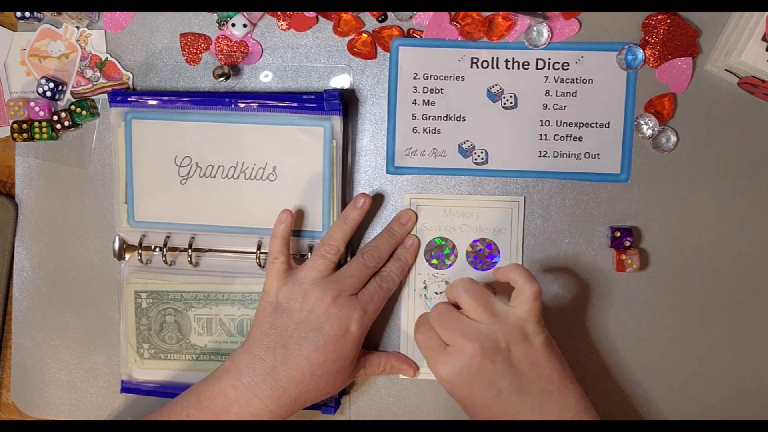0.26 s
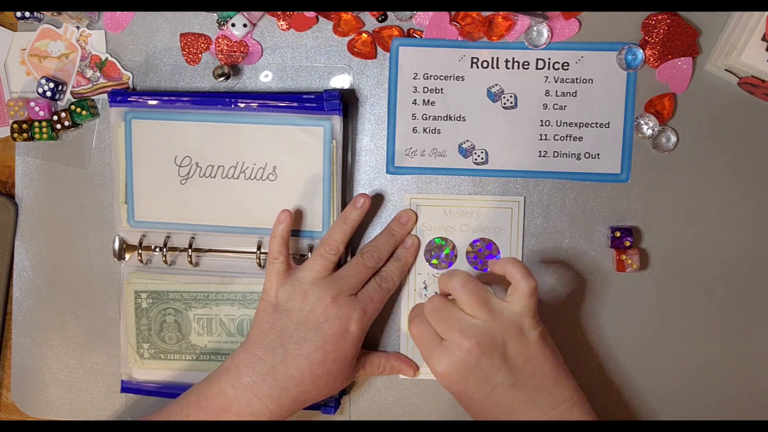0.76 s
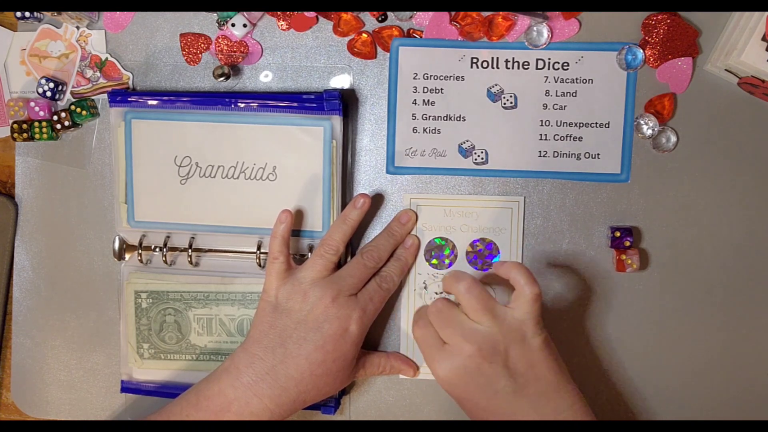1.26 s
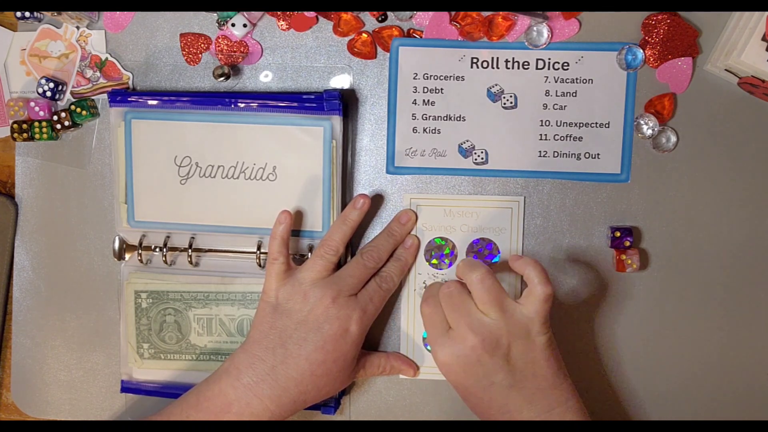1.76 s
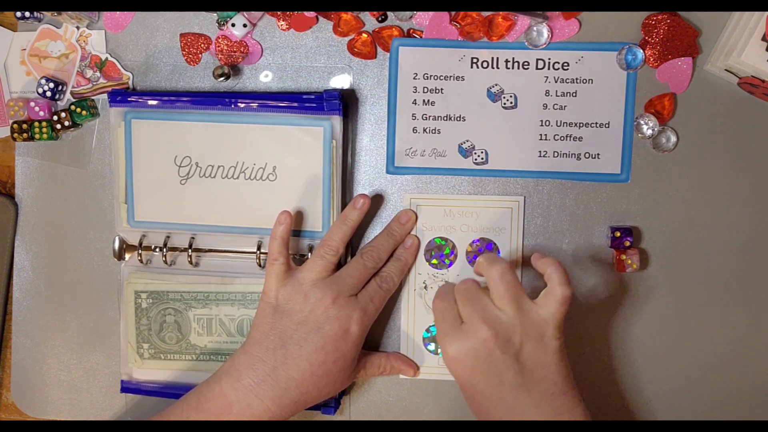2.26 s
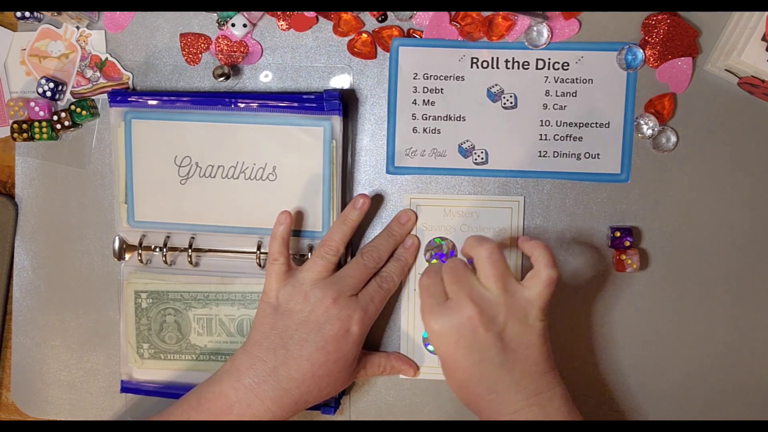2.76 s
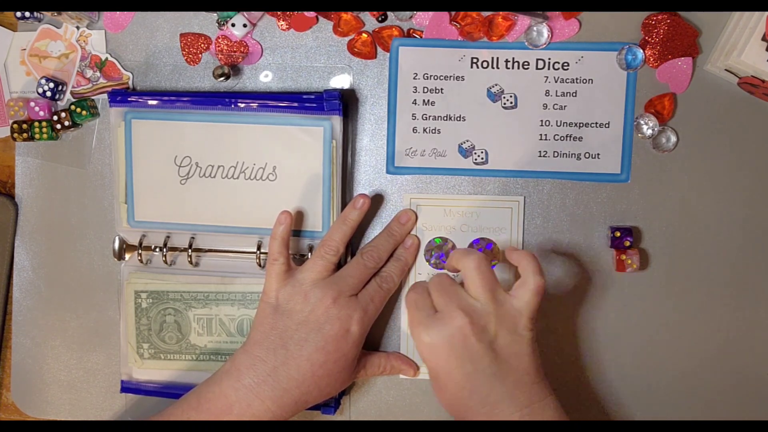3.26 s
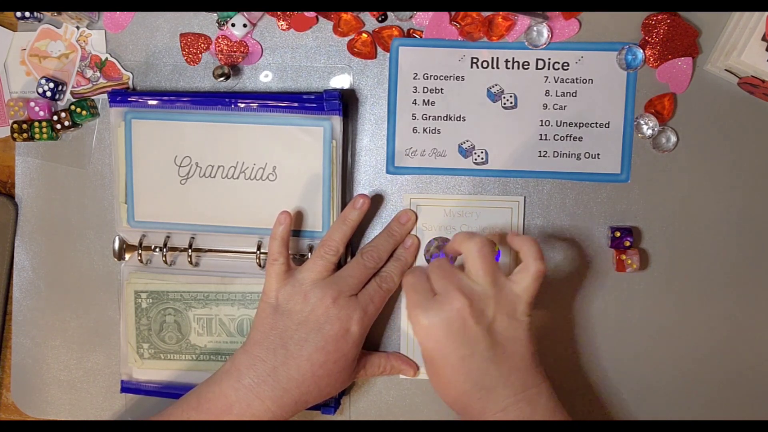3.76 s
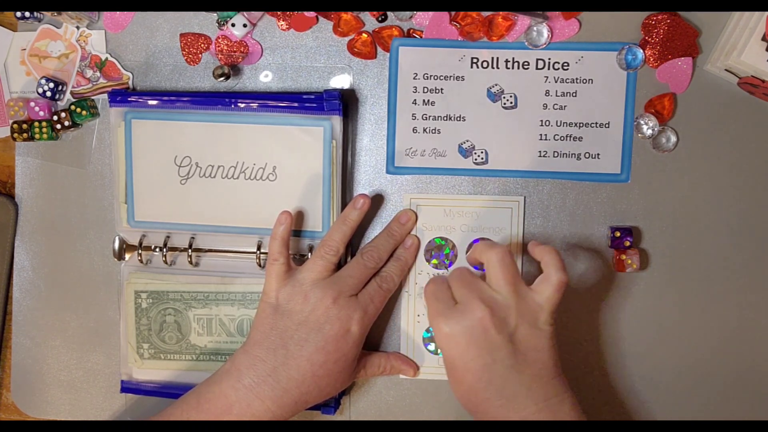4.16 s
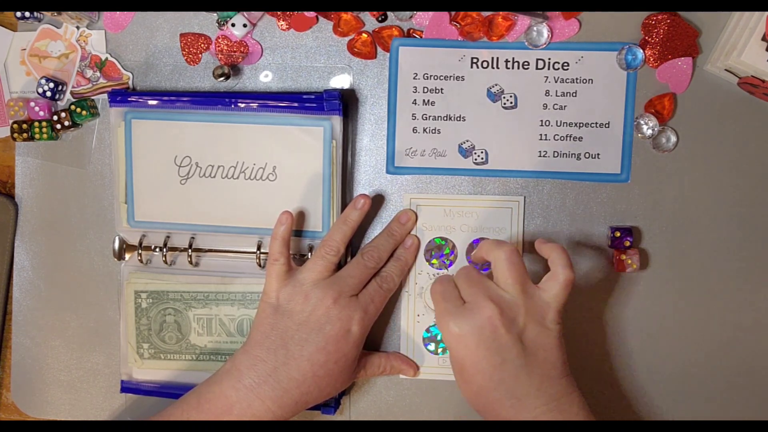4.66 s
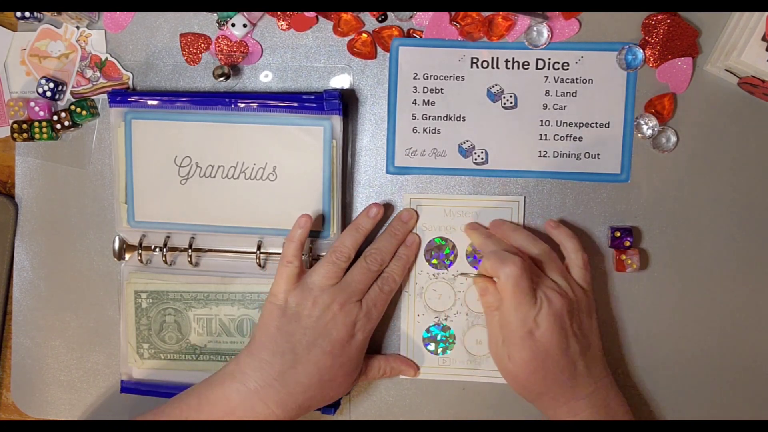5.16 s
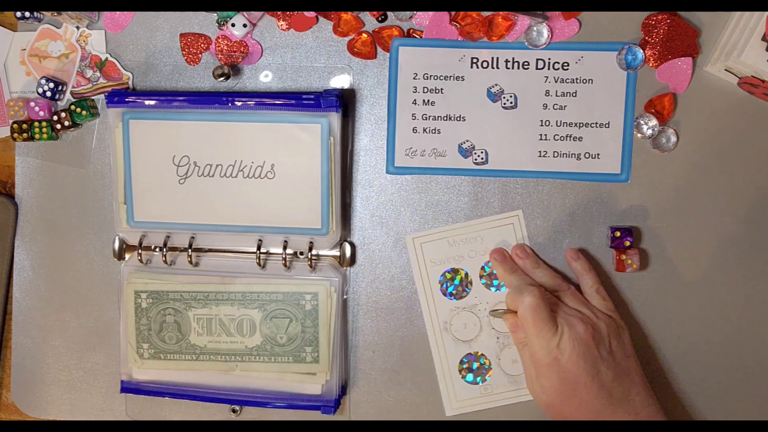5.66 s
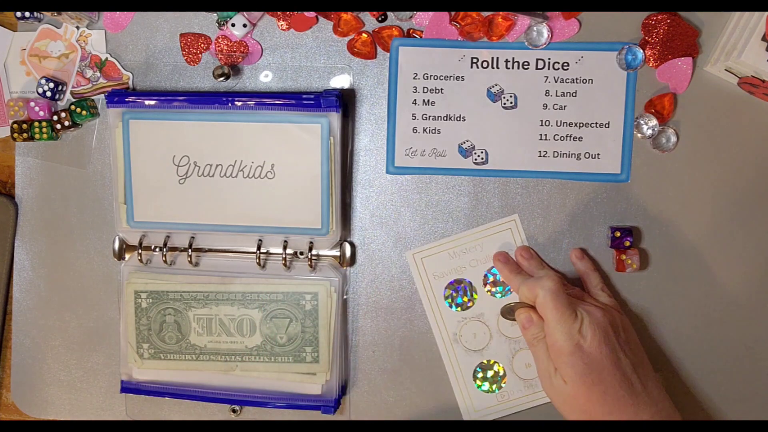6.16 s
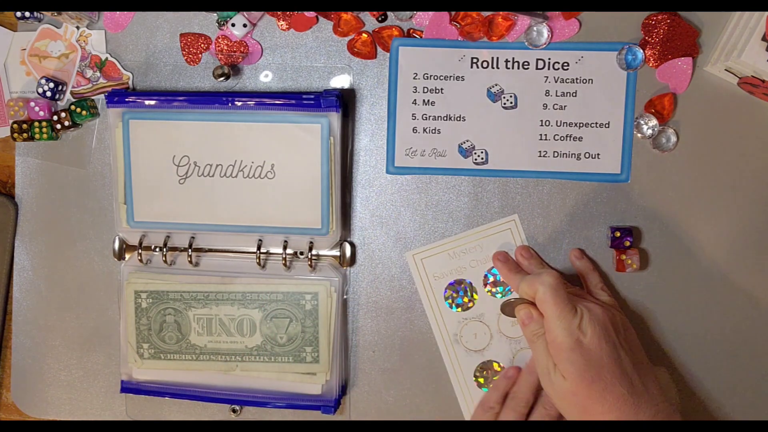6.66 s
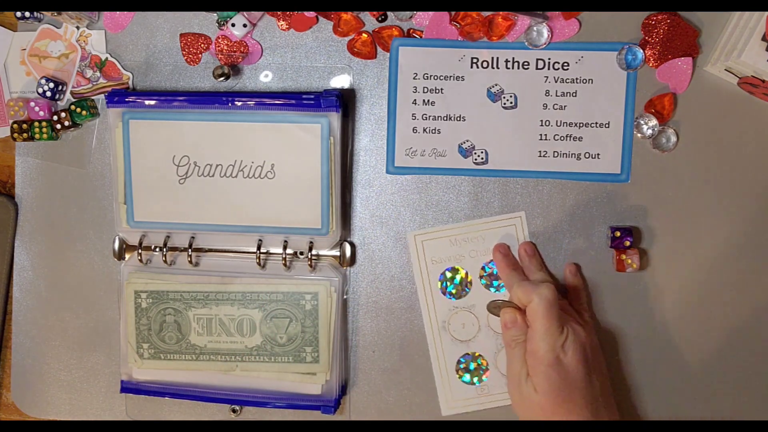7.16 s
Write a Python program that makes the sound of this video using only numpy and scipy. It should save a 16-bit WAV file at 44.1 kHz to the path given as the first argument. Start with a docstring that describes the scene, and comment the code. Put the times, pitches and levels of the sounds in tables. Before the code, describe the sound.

Rapid scratchy scraping on a paper card over a table, a sharp hissing slide, then a hand slapping and sweeping crumbs away four times.

```python
"""Quick rasping strokes: a coin edge scratches the coating off a paper card on a table.
Then the card slides round with dense hiss, and a hand slaps down and wipes the crumbs off four times.
Rasp, hiss and drag are shaped random grit through card, table and microphone resonances (ringing near 5 kHz).
Ticks and squeaks are sines, thumps ring table modes; a short room tail, rumble and hush lie behind."""
import sys
import numpy as np
from scipy import signal
from scipy.fft import rfft, irfft, next_fast_len
from scipy.io import wavfile
from scipy.ndimage import uniform_filter1d

SR = 44100
rng = np.random.default_rng(int(sys.argv[2]) if len(sys.argv) > 2 else 0)


def waveform_to_disk(signal):
    """Save audio, clipped to [-1, 1], as 16-bit WAV at the path in sys.argv[1]."""
    frames = np.transpose(np.atleast_2d(signal))
    scaled = np.clip(frames, -1, 1) * 32767
    samples = np.round(scaled).astype(np.int16)
    wavfile.write(sys.argv[1], SR, samples)


N = 326340  # samples


def amp(db):
    """Gain of a level in dB."""
    return 10 ** (np.asarray(db) / 20)


def rms_one(x):
    """Scale to rms 1."""
    return x / np.sqrt(np.mean(x ** 2) + 1e-20)


def at_hz(points, hz):
    """Interpolate a spectrum on a log-frequency axis."""
    point_hz, level = np.transpose(points)
    return np.interp(np.log(hz), np.log(point_hz), level)


def drift(corner_hz):
    """Random drift, rms 1: white noise through two equal one-pole lowpasses."""
    warmup = 9000
    r = np.exp(-2 * np.pi * corner_hz / SR)
    noise = rng.standard_normal(N + warmup)
    return rms_one(signal.lfilter([1], [1, -2 * r, r * r], noise)[warmup:])


# microphone pair, left-right likeness: (frequency [Hz], likeness [0-1])
LIKENESS = [(60, 0.98), (130, 0.93), (290, 0.72), (640, 0.46), (1410, 0), (3100, 0.18), (6820, 0.23),
            (15000, 0.0)]
# microphone pair, left minus right: (frequency [Hz], level [dB])
BALANCE = [(60, 0), (110, -2.5), (200, 2), (380, 0), (700, 3.5), (1290, -1.5), (2380, 1.5), (4400, -4.5),
           (8120, 6), (15000, -5)]


def grit(per_s, spread_db, spectrum):
    """Random stereo impulses of uneven size: tiny catches, partly alike left and right, coloured, rms 1."""
    size_db = spread_db * np.minimum(rng.exponential(1, (2, N)), 5)
    sizes = amp(size_db) * rng.standard_normal((2, N))
    catches = sizes * (rng.random(N) < per_s / SR)
    fft_size = next_fast_len(N)
    mid, side = rfft(catches, fft_size)
    hz = np.maximum(np.arange(len(mid)) * SR / fft_size, 1)
    alike = np.clip(at_hz(LIKENESS, hz), 0, 1)
    left_right = np.array([[1], [-1]])
    pair = np.sqrt(1 + alike) * mid + np.sqrt(1 - alike) * side * left_right
    balance = amp(at_hz(BALANCE, hz) / 2 * left_right)
    return rms_one(irfft(pair * balance * amp(at_hz(spectrum, hz)), fft_size)[:, :N])


def resonate(x, modes, direct_db, wander_db=0, centre_hz=None):
    """Parallel bandpass modes plus direct sound, rms 1; levels wander singly, modes near centre_hz favoured."""
    out = amp(direct_db) * x
    for k, (hz, width_hz, db) in enumerate(modes):
        r = np.exp(-np.pi * width_hz / SR)
        if wander_db:
            db = db + wander_db * drift(25.6)
        if centre_hz is not None:
            db = db - 40 * np.log2(hz / centre_hz) ** 2
        zeros = [(1 - r * r) / 2, 0, (r * r - 1) / 2]
        poles = [1, -2 * r * np.cos(2 * np.pi * hz / SR), r * r]
        out = out + (-1) ** k * amp(db) * signal.lfilter(zeros, poles, x)  # alternate polarity
    return rms_one(out)


# coin strokes: (full pressure [s], held [s], 13.5 dB fall time [s], rasp level [dB],
#                weight on the card over rasp [dB])
STROKES = [(0.018, 0.003, 0.0089, -56, -11.5), (0.045, 0.011, 0.019, -55, -10),
           (0.122, 0.004, 0.024, -65.5, 1.5), (0.162, 0.023, 0.011, -67.5, -4),
           (0.249, 0.0048, 0.012, -57.5, -6.0), (0.283, 0.022, 0.019, -56, -8),
           (0.372, 0.025, 0.03, -57, -5), (0.509, 0.0018, 0.051, -60, -3),
           (0.622, 0.0018, 0.018, -64.5, 4.5), (0.662, 0.023, 0.016, -66.5, -5.5),
           (0.758, 0.0055, 0.039, -66.5, -4.5), (0.86, 0.012, 0.068, -60.5, -8.5),
           (0.995, 0.017, 0.012, -53.5, -8.0), (1.09, 0.024, 0.083, -68.5, -4),
           (1.237, 0.051, 0.027, -59, -6.0), (1.36, 0.0067, 0.027, -55, -6.0),
           (1.491, 0.0034, 0.0055, -57, -6), (1.513, 0.019, 0.022, -60, 1),
           (1.595, 0.0086, 0.038, -60.5, -3.5), (1.736, 0.0044, 0.033, -53.5, -3.5),
           (1.824, 0.002, 0.036, -64.5, -1), (1.926, 0.013, 0.027, -60.5, -2.0),
           (2.009, 0.0057, 0.025, -58, -4.5), (2.097, 0.0097, 0.014, -60.5, -7.5),
           (2.168, 0.015, 0.017, -57, -5.5), (2.246, 0.017, 0.0094, -59, -9),
           (2.327, 0.029, 0.018, -58.5, -8), (2.406, 0.009, 0.02, -67, 1),
           (2.494, 0.02, 0.0088, -59.5, -8.5), (2.553, 0.0018, 0.026, -58.5, -7.0),
           (2.648, 0.0022, 0.03, -60.5, -1), (2.706, 0.008, 0.011, -60, -6.5),
           (2.79, 0.015, 0.016, -57.5, -4), (2.866, 0.0062, 0.027, -60.5, -3.5),
           (2.948, 0.0058, 0.022, -55.5, -2.0), (3.012, 0.016, 0.014, -62.5, -1.5),
           (3.097, 0.0017, 0.015, -55.5, -2.5), (3.161, 0.002, 0.025, -57.5, -7.5),
           (3.246, 0.014, 0.013, -58.5, -4), (3.31, 0.002, 0.031, -58.5, -3.5),
           (3.383, 0.033, 0.014, -67.5, 2), (3.464, 0.035, 0.008, -59.5, -6),
           (3.55, 0.002, 0.032, -58.5, -2), (3.627, 0.015, 0.035, -57.5, -7),
           (3.708, 0.0019, 0.028, -51, -6.5), (3.777, 0.014, 0.021, -57, -6.5),
           (3.847, 0.027, 0.01, -58.5, -5), (3.927, 0.021, 0.033, -58.5, -3.5),
           (4.011, 0.003, 0.044, -63.5, -3), (4.095, 0.032, 0.024, -66, 1.5),
           (4.169, 0.002, 0.042, -61.5, -5), (4.251, 0.031, 0.039, -68.5, 3),
           (4.341, 0.0018, 0.021, -56, -4), (4.403, 0.039, 0.022, -69, 4.5),
           (4.485, 0.01, 0.017, -61.5, 1.0), (4.553, 0.028, 0.02, -67.5, 0.5),
           (4.638, 0.041, 0.013, -65, 0.5), (4.724, 0.003, 0.014, -71, -1.5),
           (4.779, 0.018, 0.028, -67.5, 0.5), (4.85, 0.028, 0.038, -73.5, -1),
           (4.963, 0.03, 0.041, -82.5, 6.5)]
# grip on the coin: (time [s], favoured rasp pitch [Hz])
GRIP = [(0, 5430), (.8, 4800), (1.6, 4860), (2.5, 4900), (3.2, 5570), (4.0, 5500), (5.0, 5000)]
# rasp spectrum: (frequency [Hz], level per Hz [dB])
RASP = [(1500, -27), (3000, -1), (5000, -8), (8500, -4.5), (10000, -14.5), (13000, -12), (16000, -17)]
# microphone resonances: (frequency [Hz], width [Hz], level [dB])
MIC_MODES = [(4210, 107, -11.5), (4940, 178, 5.5), (5303, 250, 0.5), (5277, 117, 4), (6326, 900, -7.5),
             (6485, 1560, -12), (7640, 230, -4), (8050, 67, -33)]
# card resonances: (frequency [Hz], width [Hz], level [dB])
CARD_MODES = [(649, 43, 0.5), (794, 176, -6.5), (1016, 182, -4), (1249, 63, 3), (1610, 91, -1.5),
              (1830, 73, -3), (2127, 280, -6.5), (2620, 93, -8), (3066, 70, -2.5), (3440, 250, -26)]
STROKE_RISE_S, GRIP_WANDER_OCTAVES = 0.016, 0.095
BODY_LAG_S = 0.0049  # card behind rasp, and table behind card
CARD_SHAKE_DB, CARD_DB_PER_WEIGHT_DB = 0.5, 0.71
TABLE_SHAKE_DB, TABLE_DB_PER_WEIGHT_DB = 1.5, 1.38


def coin():
    """Each stroke leans in, presses and eases off; the grit rasps and shakes card and table, which lag."""
    t = np.arange(N) / SR
    press = np.zeros((3, N))  # rasp, card, table
    for start, held, fall, rasp_db, weight_db in STROKES:
        near = slice(max(0, int((start - .15) * SR)), int((start + held + .2) * SR))
        before = (start - t[near]) / STROKE_RISE_S
        after = (t[near] - start - held) / fall
        off = np.maximum(np.maximum(before, after), 0)
        card_db = CARD_SHAKE_DB + CARD_DB_PER_WEIGHT_DB * weight_db
        table_db = TABLE_SHAKE_DB + TABLE_DB_PER_WEIGHT_DB * weight_db
        press[:, near] += amp(rasp_db - 13.5 * off ** 1.98 + np.array([[0], [card_db], [table_db]]))
    press *= amp(1.7 * drift(120))  # the edge catches and slips

    grip_hz = np.interp(t, *np.transpose(GRIP)) * 2 ** (GRIP_WANDER_OCTAVES * drift(7.2))
    rasp = resonate(grit(9000, 0.35, RASP), MIC_MODES, -18.5, 1.92, grip_hz)
    card_grit = grit(6000, 2.0, [(300, -42), (600, -0.5), (1500, -2.5), (4000, -11.0), (9000, -47)])
    card = resonate(card_grit, CARD_MODES, -23.0, 0.81)
    table_grit = grit(3000, 3.4, [(90, -21.5), (300, -2.5), (900, -37.0)])
    table_modes = [(330.4, 65, -3.5), (218, 260, -9), (146.5, 27.7, 0.0)]
    table = resonate(table_grit, table_modes, -23, 1.3)
    late = [np.interp(t - k * BODY_LAG_S, t, gain) for k, gain in enumerate(press)]
    return late[0] * rasp + late[1] * card + late[2] * table


# thin squeaks: (start [s], length [s], from [Hz], to [Hz], level [dB], second harmonic over first [dB])
SQUEAKS = [(1.065, .045, 3170, 3080, -77, -20), (4.33, .025, 3220, 3240, -72, -20),
           (4.405, .06, 3250, 3070, -76, -20), (4.46, .045, 3070, 3280, -74, -20),
           (4.525, .065, 3350, 2970, -76, -20), (6.935, .1, 2520, 2760, -82, 5)]


def squeaks():
    """Faint stick-slip whistles, two harmonics each, that swell, glide and flutter."""
    out = np.zeros(N)
    flutter = amp(2.5 * drift(60))
    waver = 1 + .003 * drift(200)
    for start, length, from_hz, to_hz, db, second_db in SQUEAKS:
        near = slice(int(start * SR), int((start + length) * SR))
        part = np.linspace(0, 1, near.stop - near.start)
        hz = (from_hz + (to_hz - from_hz) * part) * waver[near]
        phase = 2 * np.pi * np.cumsum(hz) / SR
        swell = np.sqrt(np.abs(np.sin(np.pi * part)))
        out[near] += amp(db) * swell * (np.sin(phase) + amp(second_db) * np.sin(2 * phase))
    return out * flutter


# card nudged and slid round, later drawn away; per slide, rows of
# (time [s], hiss level [dB], weight level [dB])
CARD_SLIDES = [
    [(5.235, -95, -90), (5.252, -67, -67.5), (5.28, -86, -90), (5.304, -66.5, -75), (5.33, -72, -87)],
    [(5.36, -71, -94), (5.372, -63.5, -77), (5.41, -66, -85), (5.474, -57.5, -71.5), (5.54, -52, -70.5),
     (5.58, -47.5, -70), (5.594, -41.5, -66), (5.606, -45, -73), (5.628, -49, -67), (5.64, -40.5, -67),
     (5.652, -45.5, -57), (5.662, -76, -75), (5.7, -75, -96), (5.81, -77.5, -106), (5.85, -94, -99)],
    [(6.67, -77, -88), (6.684, -63, -83), (6.7, -72, -73), (6.716, -78, -76)],
    [(7.2, -79, -92), (7.272, -68, -89), (7.32, -64, -90), (7.4, -59, -69)],
]
# one entry per slide: (treble over hiss [dB])
SLIDE_TREBLE = [-5.5, -7, 1, -12.5]
SLIDE_DRAG_DB = 10  # table drag over weight


def card_slides():
    """Gains of hiss, treble, weight, drag and pitch climb as the card slides; no climb here."""
    t = np.arange(N) / SR
    speed, treble, weight = np.zeros((3, N))
    for rows, treble_db in zip(CARD_SLIDES, SLIDE_TREBLE):
        s, hiss_db, weight_db = np.transpose(rows)
        hiss = amp(np.interp(t, s, hiss_db, -200, -200))
        speed += hiss
        treble += amp(treble_db) * hiss
        weight += amp(np.interp(t, s, weight_db, -200, -200))
    return np.array([speed, treble, weight, amp(SLIDE_DRAG_DB) * weight, np.zeros(N)])


# hand wipes: (lands [s], full weight after [s], down for [s], flick before lift [s], rub level [dB],
#              swell over wipe [dB], flick level [dB], weight level [dB], treble over rub [dB],
#              drag over weight [dB])
WIPES = [(5.98, .006, 0.14, 0.013, -49.5, 2.5, -40, -69.5, -6, 20),
         (6.4, .005, 0.11, 0.022, -46, -0.5, -42.5, -67, -8, 17),
         (6.718, 0.02, 0.1, 0.041, -47, -4.0, -47, -59.5, -8, 15),
         (7.073, 0.011, .075, 0.018, -49.5, -1.5, -50.5, -63.5, -9.5, 6.5)]
LAND_S, SETTLE_S, LIFT_S, FLICK_S = 0.0034, 0.0095, 0.0027, 0.012  # time constants
LAND_HISS_DB, LAND_WEIGHT_DB = -1.5, 11.0  # landing over steady rub
FLICK_TREBLE_DB, FLICK_WEIGHT_DB = -9, -33  # over flick hiss
WIPE_RISE_OCTAVES = 0.094


def wipes():
    """Gains as in card_slides: each wipe lands hard, rubs with rising pitch, flicks crumbs away and lifts."""
    t = np.arange(N) / SR
    gains = np.zeros((5, N))
    speed, treble, weight, drag, climb = gains
    for (lands, delay, length, lead, rub_db, swell_db, flick_db,
         weight_db, treble_db, drag_db) in WIPES:
        lifts = lands + length
        down = np.exp(-np.maximum(np.maximum((lands - t) / LAND_S, (t - lifts) / LIFT_S), 0))
        impact = np.exp(-np.abs(t - lands - delay) / SETTLE_S)
        along = np.clip((t - lands) / length, 0, 1)
        rub = down * amp(rub_db + swell_db * along) * (1 + amp(LAND_HISS_DB) * impact)
        flick = down * amp(flick_db) * np.exp(-((t - lifts + lead) / FLICK_S) ** 2)
        lean = down * amp(weight_db) * (1 + amp(LAND_WEIGHT_DB) * impact)
        lean += amp(FLICK_WEIGHT_DB) * flick
        speed += rub + flick
        treble += amp(treble_db) * rub + amp(FLICK_TREBLE_DB) * flick
        weight += lean
        drag += amp(drag_db) * lean
        climb += WIPE_RISE_OCTAVES * along * down
    return gains


TREBLE_LOSS_DB_PER_DB = 0.3  # as hiss grows


def rubbing():
    """Skin rubs finer than metal: dense hiss through card and microphone modes, low drag on the table."""
    speed, treble, weight, pull, climb = card_slides() + wipes()
    hiss_db = 20 * np.log10(speed + 1e-9)
    flutter = amp(1.77 * drift(72))
    # louder hiss sounds higher
    centre_hz = 5300 * 2 ** (np.maximum(hiss_db + 31, -6) / 40 + climb)
    hiss_grit = grit(20000, 0.8, [(1500, -29), (3500, -0.5), (5500, 7.5), (8500, -2.0), (11000, -41)])
    hiss = resonate(hiss_grit, MIC_MODES, -7.5, 2.25, centre_hz)
    air = grit(20000, 0.84, [(6000, -39), (9500, -11.5), (10500, -12.5), (12500, -6.5), (16000, -13)])
    card_grit = grit(9000, 0.45, [(300, 6.5), (700, 3.5), (1200, -2.5), (2200, 5.0), (3500, -2), (6000, -21)])
    card = resonate(card_grit, CARD_MODES, -6, 2.9)
    drag = grit(4000, 0.34, [(35, 5), (70, 7), (125, 0.5), (160, -5.5), (250, -10.5), (600, -35)])
    bright = treble * amp(-TREBLE_LOSS_DB_PER_DB * np.maximum(hiss_db + 46, 0))
    smooth_pull = uniform_filter1d(pull, size=500)
    return flutter * (speed * hiss + bright * air + weight * card + smooth_pull * drag)


# coin, nails and card edge ticking: (time [s], level [dB], ring [Hz], crack over ring [dB])
TICKS = [(.502, -41, 5180, -19), (.9705, -45.5, 3530, -30), (1.003, -58, 5000, -10), (1.607, -43, 5100, -8),
         (1.827, -40.5, 4940, -13), (2.943, -48, 5280, -18), (3.551, -37.5, 5210, -17),
         (3.710, -36.5, 5180, -27), (4.339, -39.5, 4840, -24), (5.245, -62, 4940, 1),
         (5.302, -56, 4570, -2.5), (5.367, -55, 4900, -6), (5.589, -45, 4820, -8), (5.635, -35, 5050, -9),
         (5.646, -27.5, 5220, -9), (5.9808, -29.5, 4730, -2), (5.985, -28, 4770, -19), (6.4, -47, 5000, -7),
         (6.4027, -29, 5020, 4.5), (6.724, -52, 5070, -7), (6.732, -36, 4670, -5), (7.0736, -28, 4280, -26),
         (7.0803, -21.5, 4920, -18), (7.0881, -24, 5120, -8.5), (7.275, -60, 5000, -12)]


def ticks():
    """A short decaying sine with a broad noise crack on top, both gone in a few milliseconds."""
    t = np.arange(400) / SR
    ring, strike = np.zeros((2, N))
    envelope = np.exp(-t / .0012) * (1 - np.exp(-t / 0.00025))
    for s, db, hz, crack_db in TICKS:
        at = round(s * SR)
        ring[at:at + len(t)] += amp(db) * np.sin(2 * np.pi * hz * t) * envelope
        strike[at] = amp(db + crack_db)
    fade = signal.lfilter([1], [1, -np.exp(-1 / (0.0011 * SR))], strike)
    crack = grit(SR, 0, [(500, 1.5), (2000, -25), (5000, 9), (8500, 6), (10500, -10), (13000, 7), (16000, 5.5)])
    return ring * amp([[-3], [2.5]]) + fade * crack  # ring leans right


# fingers landing on the table: (time [s], level [dB], favoured pitch [Hz])
THUMPS = [(4.284, -46.5, 293), (5.637, -46.5, 112), (5.985, -32, 283), (6.1, -33.5, 117), (6.4, -33, 97),
          (6.478, -40, 118), (6.507, -40, 118), (6.715, -60, 120), (6.735, -56, 147), (6.743, -23, 118),
          (6.815, -37, 120), (7.09, -28.5, 154), (7.134, -45.5, 121)]
# table modes: (frequency [Hz], level [dB], t60 [s])
TABLE_MODES = [(60, -33, .2), (80, -33, 0.15), (127.4, 1, 0.096), (164, -6, 0.056), (274, -3.5, 0.12),
               (313.5, 1.5, 0.075), (486, -4, 0.13), (620, -15, .04)]


def thumps():
    """A soft blow rings the table modes, most those near its pitch; two 450 Hz lowpasses soften it."""
    s, db, pitch_hz = np.transpose(THUMPS)
    at = np.round(s * SR).astype(int)
    out = np.zeros(N)
    for hz, mode_db, t60_s in TABLE_MODES:
        blows = np.zeros(N)
        blows[at] = amp(db + mode_db - 25 * np.log2(hz / pitch_hz) ** 2)
        r, w = amp(-60 / (t60_s * SR)), 2 * np.pi * hz / SR
        out += signal.lfilter([0, np.sin(w)], [1, -2 * r * np.cos(w), r * r], blows + 1e-18)
    soft = np.exp(-2 * np.pi * 450 / SR)
    return signal.lfilter([(1 - soft) ** 2], [1, -2 * soft, soft ** 2], out)


ECHO_DB, ECHO_T60_S = -11.5, 0.17


def echoes(x):
    """Room tail: convolution with dying noise after a 4 ms gap, independent for each side."""
    t = np.arange(int(.4 * SR)) / SR
    tail = rng.standard_normal((2, len(t))) * amp(-60 * t / ECHO_T60_S) * (t > .004)
    tail = tail / np.sqrt(np.sum(tail ** 2, 1, keepdims=True))  # unit energy
    return signal.fftconvolve(x, tail, axes=1)[:, :N]


# rumble swell before drift: (time [s], level [dB])
RUMBLE = [(0.0, -56), (0.74, -54), (1.01, -57.5), (1.44, -50), (1.81, -57), (2.39, -55.5), (2.55, -56.5),
          (2.78, -60), (3.11, -53.5), (3.32, -56.5), (3.75, -53), (4.04, -60.5), (4.47, -59.5), (4.95, -62),
          (5.4, -60), (5.52, -61.5), (6.33, -61.5), (6.53, -63), (6.8, -60), (6.94, -56), (7.13, -58.5),
          (7.4, -64)]
# room noise spectrum: (frequency [Hz], level per Hz [dB])
ROOM = [(15, -53), (25, -19), (48, -10.5), (97, -5.5), (166, -21.5), (206, -25), (439, -33.5), (641, -33),
        (695, -31), (1400, -36), (1520, -38), (1840, -39), (2000, -49), (5730, -43.5), (16000, -95)]
ROOM_DB, HUSH_DB = -62, -76.5


def background():
    """Shaped noise: faint room noise, a low rumble that swells and dips, a hush in the microphone modes."""
    s, db = np.transpose(RUMBLE)
    swell = amp(np.interp(np.arange(N) / SR, s, db) + 1.3 * drift(3.2))
    rumble = grit(SR, 0, [(15, -8.5), (30, -8.0), (52, 2.5), (82, 2.5), (115, -9.5), (170, -20.0), (300, -58.5)])
    hush_noise = grit(SR, 0, [(2500, -2.5), (5000, -8), (9000, -14.0), (10500, -23), (16000, -16)])
    hush = resonate(hush_noise, MIC_MODES, -6.5)
    return swell * rumble + amp(ROOM_DB) * grit(SR, 0, ROOM) + amp(HUSH_DB) * hush


def scene():
    """Hands with their room tail, over table thumps and background."""
    hands = coin() + rubbing() + ticks() + squeaks()
    return hands + amp(ECHO_DB) * echoes(hands) + thumps() + background()


def record(dry):
    """Steep lowpass: 60 dB down from 16536 Hz up."""
    return signal.sosfilt(signal.cheby2(14, 60, 16536, fs=SR, output="sos"), dry)


dry = scene()
out = record(dry)
waveform_to_disk(out)
```